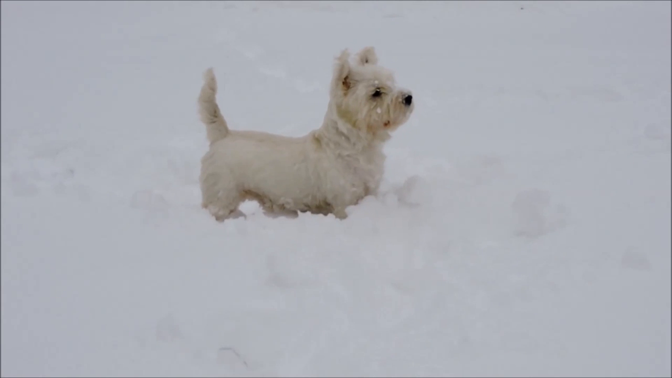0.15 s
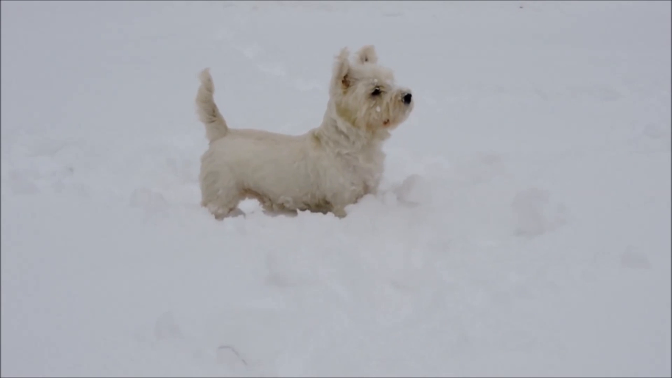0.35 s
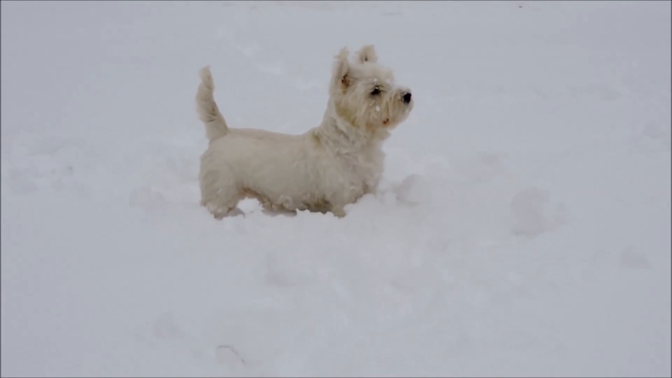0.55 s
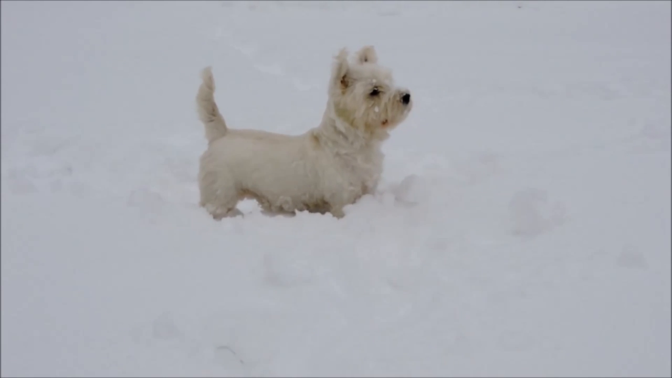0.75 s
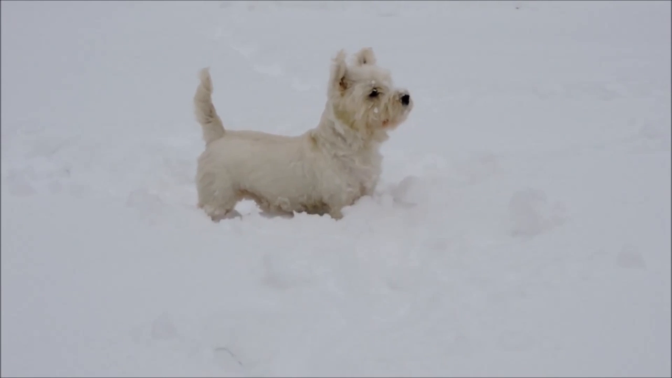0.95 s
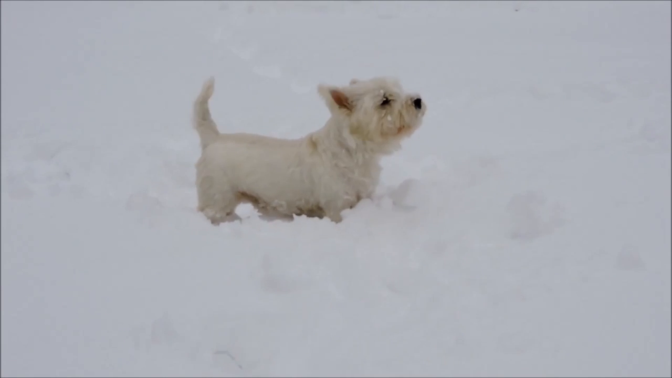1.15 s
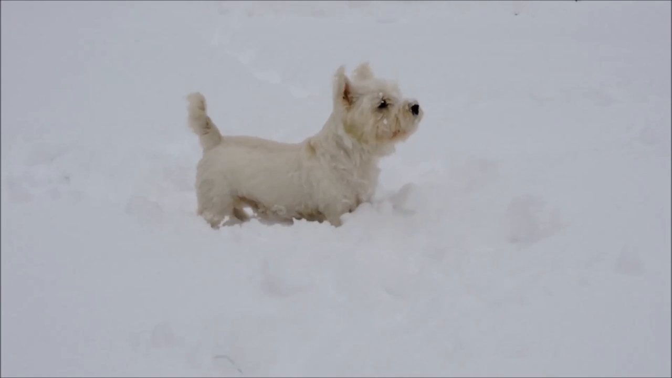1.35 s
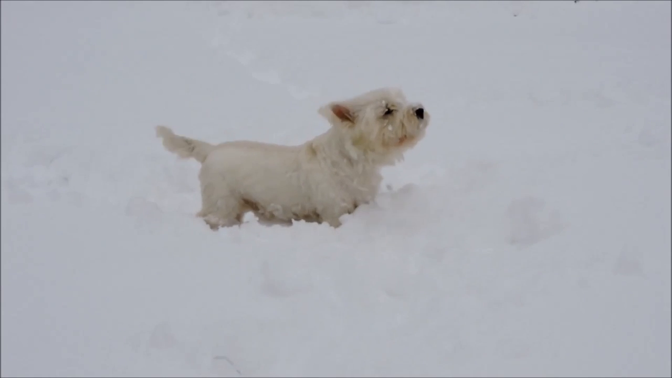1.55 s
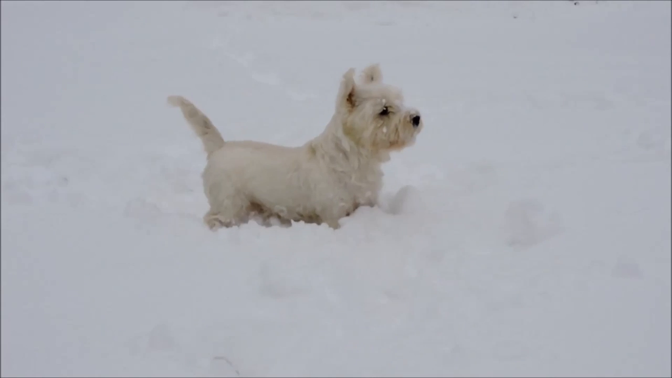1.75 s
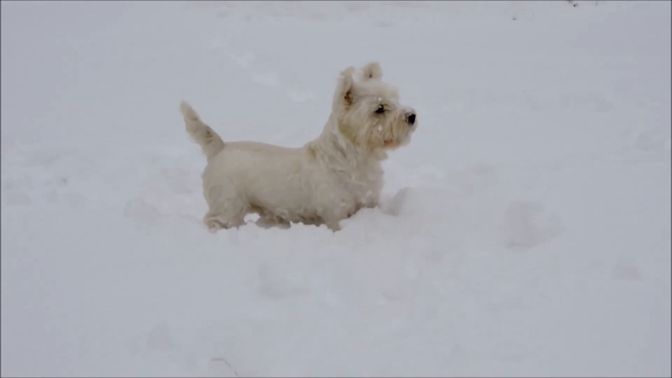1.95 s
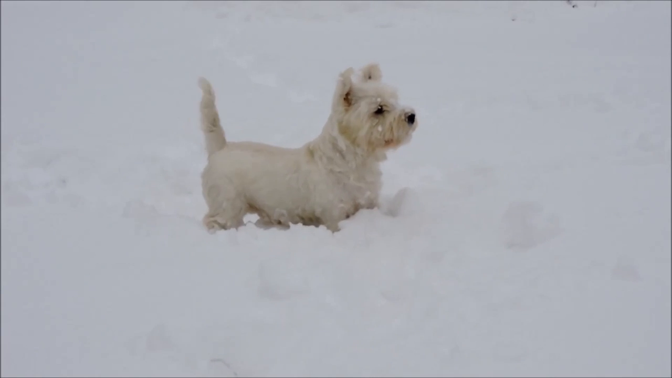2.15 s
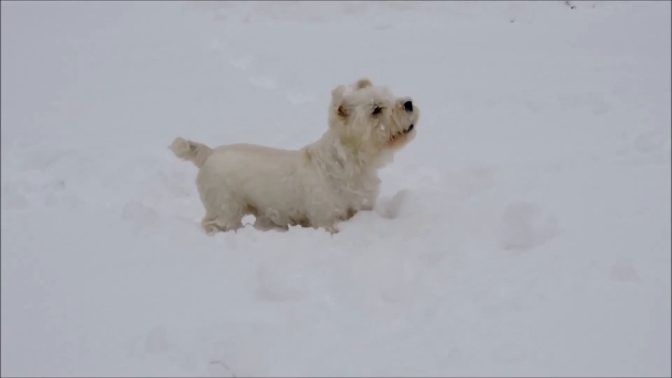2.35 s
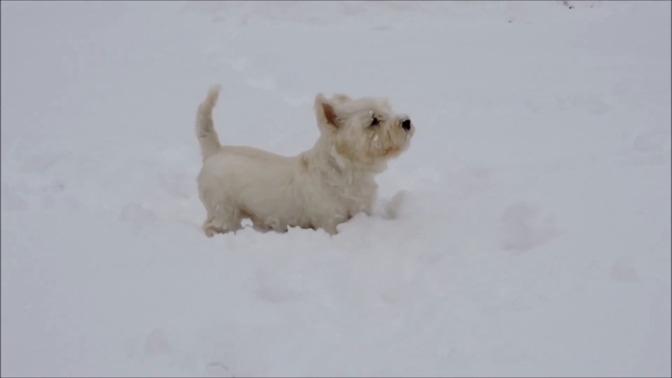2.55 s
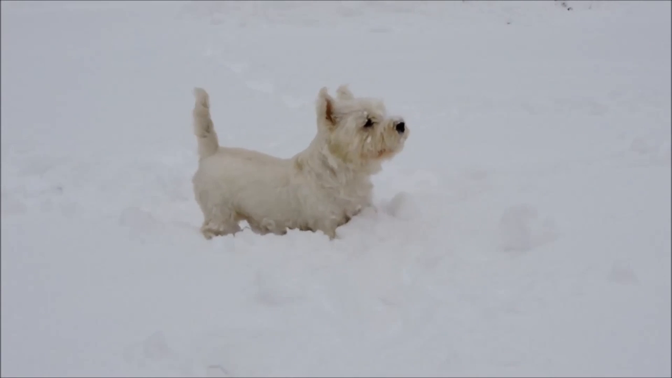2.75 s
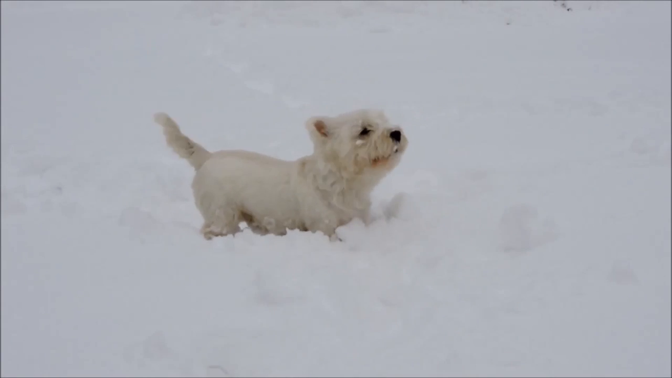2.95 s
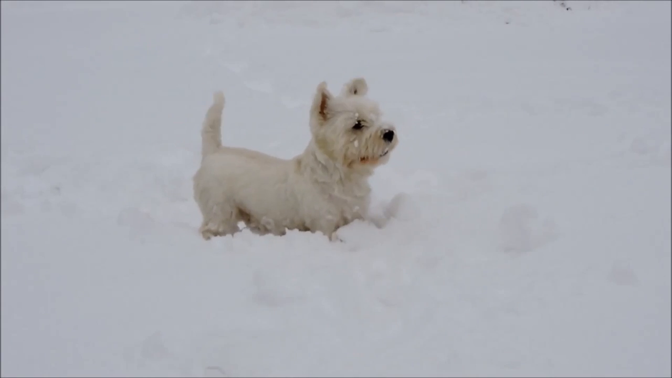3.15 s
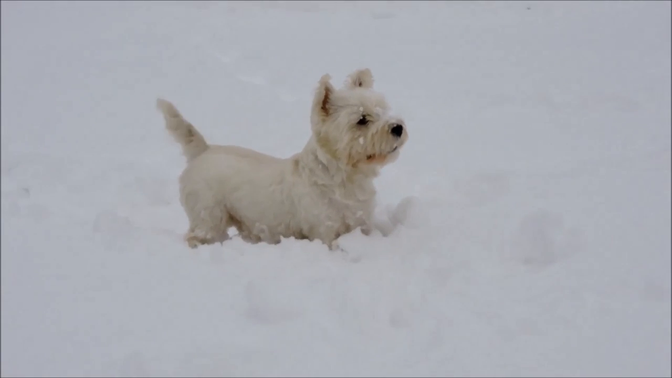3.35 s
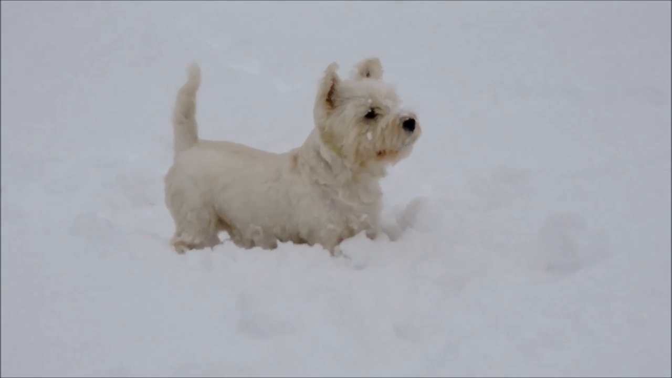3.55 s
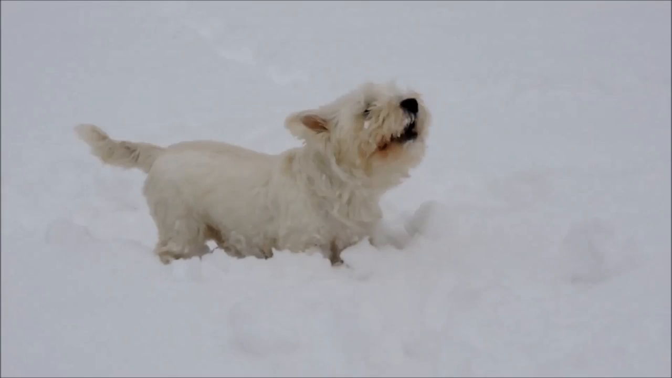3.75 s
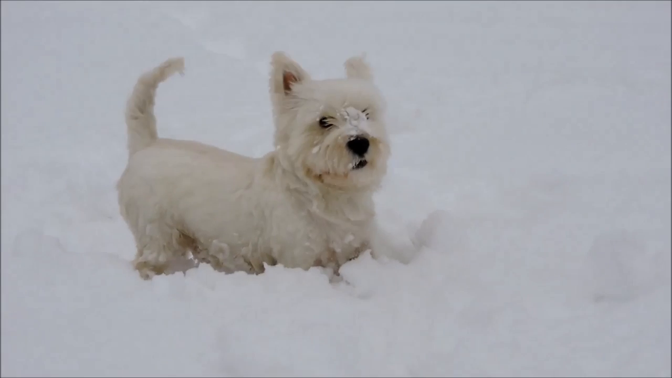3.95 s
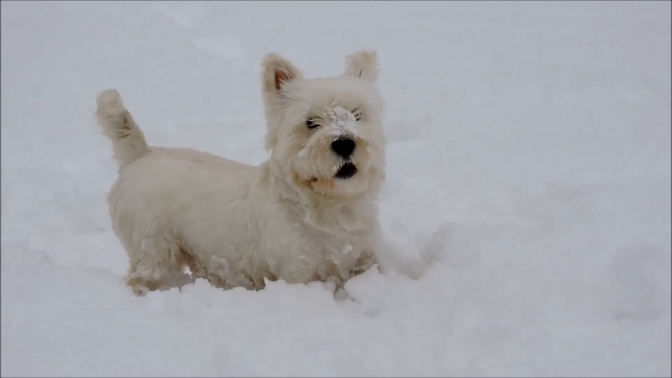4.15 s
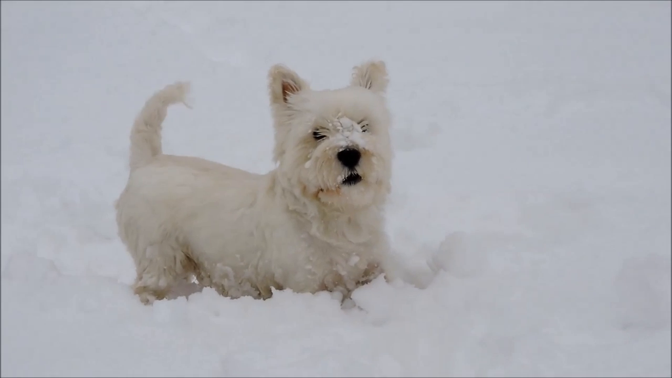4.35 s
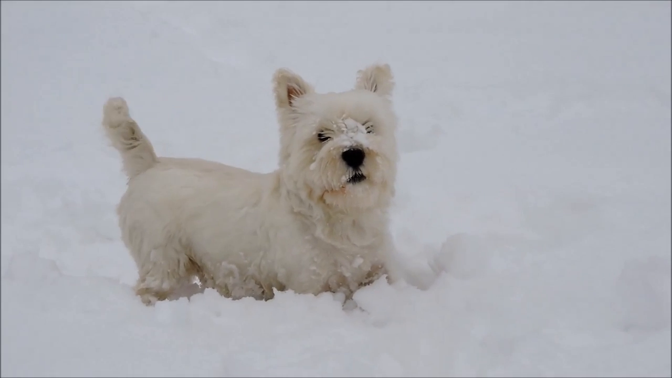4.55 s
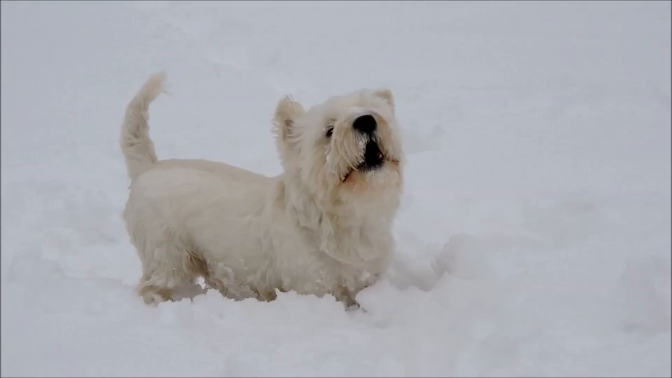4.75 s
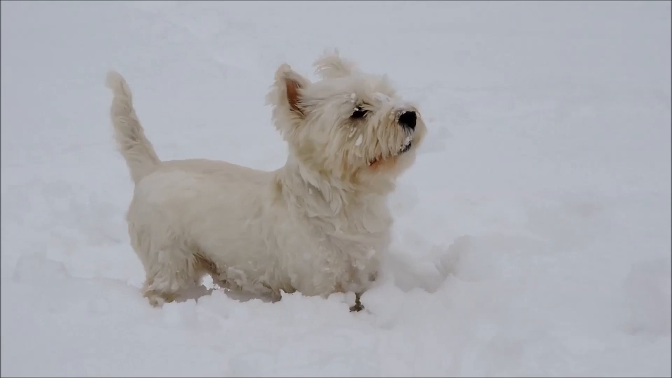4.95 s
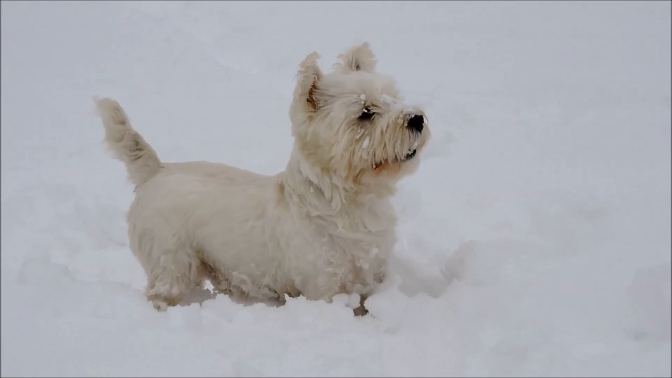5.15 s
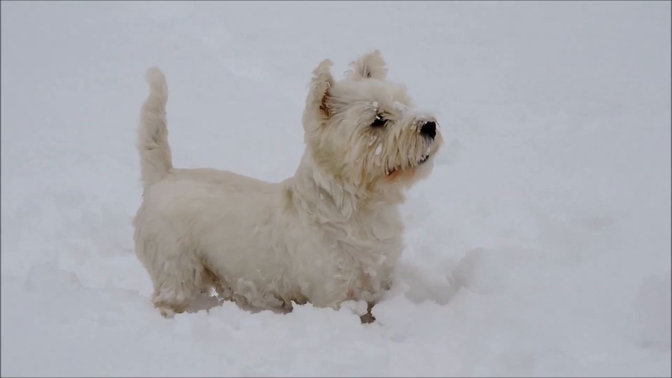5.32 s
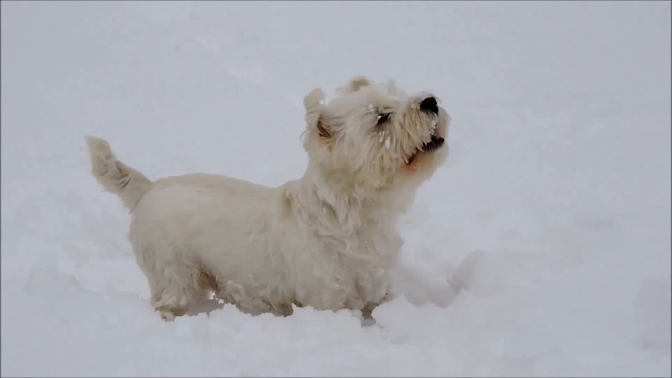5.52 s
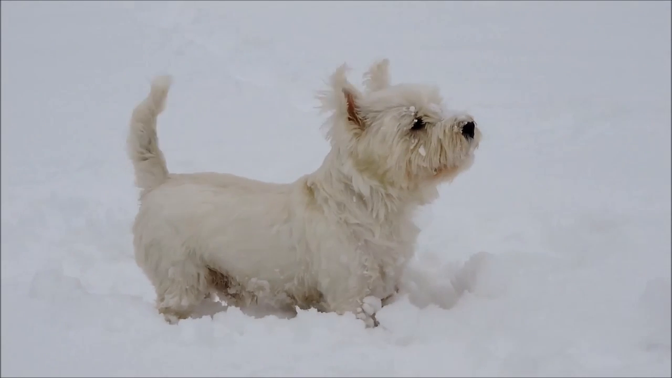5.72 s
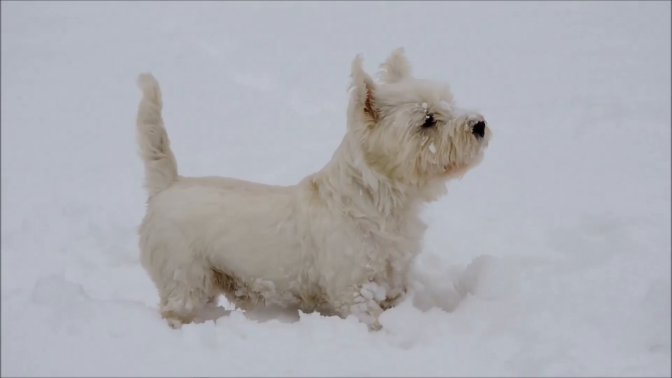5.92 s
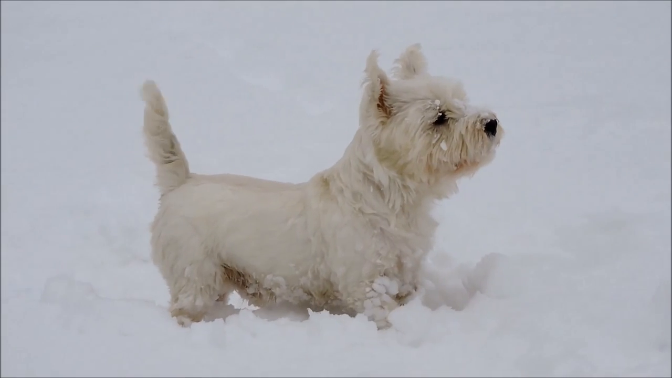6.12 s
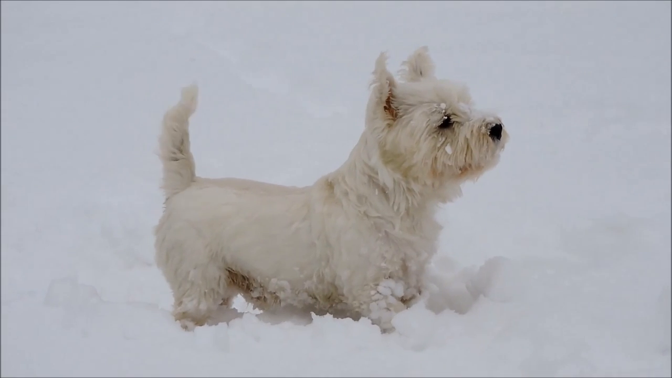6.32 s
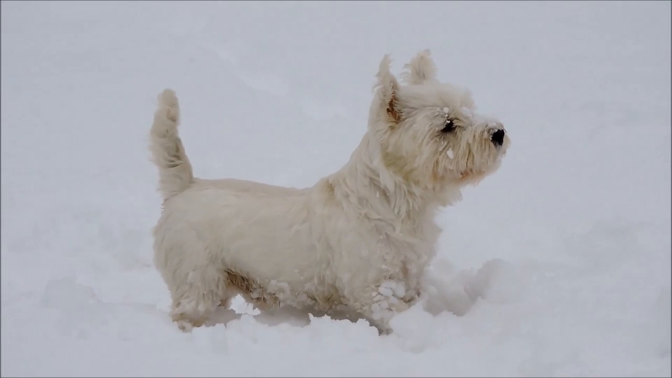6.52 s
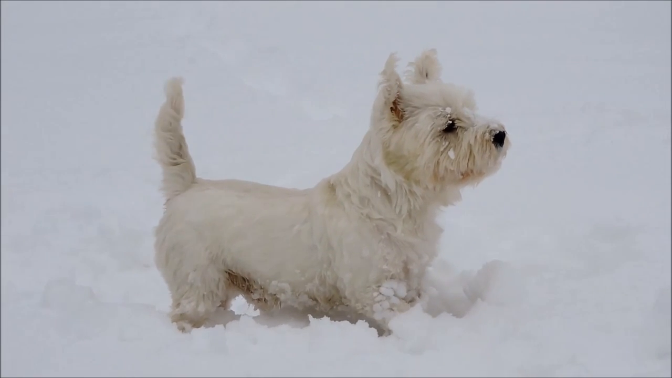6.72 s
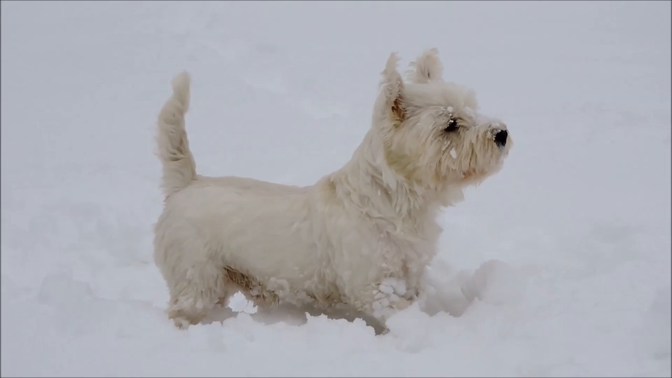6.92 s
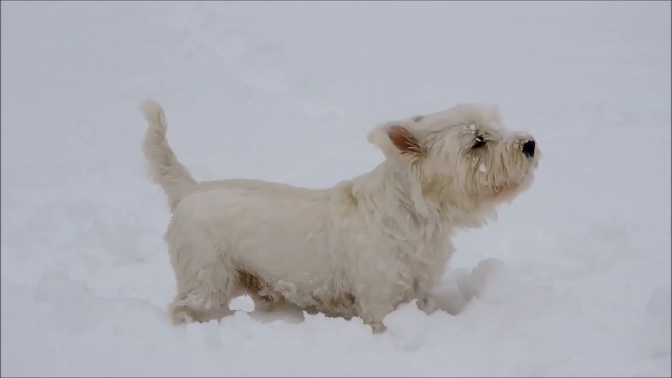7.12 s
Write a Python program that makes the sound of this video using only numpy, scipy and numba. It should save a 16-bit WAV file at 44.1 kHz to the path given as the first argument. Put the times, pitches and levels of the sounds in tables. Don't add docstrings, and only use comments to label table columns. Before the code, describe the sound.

A small white terrier stands in a snowy field and barks eight times, single short yaps that start clear and break hoarse. Gaps are uneven, with faint grumbles after some barks and tiny sniffs between. Wind thumps and flutters on a handheld camera microphone, heavier on the right, over soft far traffic hiss. Small plastic ticks dot the pauses, and the loudest barks overload slightly.

```python
import sys
import numpy as np
from scipy import signal
from scipy.fft import rfft, irfft, next_fast_len
from scipy.io import wavfile
from scipy.ndimage import uniform_filter1d, minimum_filter1d
from numba import njit

SR = 44100
rng = np.random.default_rng(int(sys.argv[2]) if len(sys.argv) > 2 else 0)


def boost_factor(decibels):
    exponent = np.asarray(decibels, float) / 20
    return 10 ** exponent


def store_wav(level_fs):
    pcm = np.round(np.clip(np.atleast_2d(level_fs), -1, 1) * 32767)
    wavfile.write(sys.argv[1], SR, pcm.T.astype(np.int16))


N = 316638

# start_s, length_s, right_thud_db, left_minus_right_db, flutter_over_thud_db
GUSTS = [(-.05, 0.47, -19.5, -7.5, -4.5), (0.493, 0.33, -21, -9.5, 2), (0.775, 0.46, -22.5, -7, 2),
         (1.305, 0.23, -22, -5, -1.5), (1.62, 0.23, -25, -3.5, -9), (2.006, 0.16, -15.5, -17, -6.5),
         (2.165, 0.23, -19.5, -11.5, -2.5), (2.568, 0.07, -23, -3, 1.5), (2.72, 0.17, -18, -10.5, -6.5),
         (2.923, 0.6, -31, -24, -3.5), (3.889, 0.087, -25.5, -20, -6), (4.257, 0.25, -26.5, -11, -4),
         (4.547, 0.29, -29, -4, 0), (4.978, 0.43, -23.5, -11, -15.5), (5.48, 0.27, -36, 3.5, 0),
         (5.776, 0.33, -27.5, -2.5, -9.5), (6.1, 0.52, -30, -2, -6.5), (6.54, 0.22, -24, -10, -8.5),
         (6.835, 0.29, -20, -14, -6.5)]
# time_s, traffic_db, drone_db
AIR_LEVELS = [(0, -47.5, -56), (1, -51, -46.5), (2.3, -50, -59.5), (2.85, -52, -51), (3.1, -57, -62),
              (4.0, -55, -62.5), (4.24, -61, -57), (4.29, -55, -59), (5.6, -54.5, -57.5),
              (5.8, -53.5, -48.5), (7.18, -55.5, -47)]
# freq_hz, level_db
TRAFFIC_SPECTRUM = [(350, -13), (600, 1.5), (950, 2.5), (1500, -1), (2300, 0.5), (4100, -5), (7000, -14),
                    (10000, -67)]
RUSTLE_SPECTRUM = [(2650, -38), (4500, -37), (5570, -0.5), (8020, 9.5), (9630, 7), (12200, 3.5),
                   (15600, -4)]
DRONE_SPECTRUM = [(200, -3), (300, -3), (520, -5.5), (700, -47)]
# full_voice_s, level_db, fall_s, sag_db_per_s, pitch_hz
BARKS = [
    (1.081, -6.5, 0.15, 82.5, 706.6),
    (1.501, -4.5, 0.17, 98.5, 674.3),
    (2.400, -4.5, 0.16, 54.5, 733.7),
    (2.884, -3, 0.18, 113.5, 751.5),
    (3.754, -9.5, 0.15, 7.5, 728),
    (4.807, -4.5, 0.15, 20.5, 747),
    (5.562, -5.5, 0.16, 44, 730),
    (7.059, -3, 0.15, 58, 749),
]
# time_s, facing_0_to_1, jaw_snap_db_per_s
HEAD = [
    (1.08, 0.78, 1044),
    (1.5, 0.1, 863.5),
    (2.4, 0.21, 898),
    (2.9, 0.46, 701),
    (3.75, 0.32, 657),
    (4.8, 0.82, 656),
    (5.56, 0.88, 1099),
    (7.06, 0, 854),
]
# freq_hz, width_hz, level_db
TEETH = [(4200, 1200, -5), (5100, 800, -6), (6400, 900, -9), (8000, 700, -2), (9800, 1600, -3),
         (13000, 2500, -10)]
# time_s, level_db, resonance_hz
GRUMBLES = [
    [(1.66, -42, 625), (1.746, -54, 639), (1.78, -46, 639)],
    [(2.55, -45.5, 635), (2.8, -50.5, 640), (2.83, -58, 667)],
    [(5.72, -43.5, 637), (5.842, -59.5, 646), (5.85, -33, 676)],
]
# time_s, level_db, resonance_hz
PUFFS = [
    [(3.9, -58, 1500), (3.95, -56, 1790), (4.01, -70, 1900)],
    [(4.96, -48.5, 1487), (5.0, -47.5, 1700), (5.06, -58, 1700)],
    [(6.56, -57, 1700), (6.61, -49.5, 1770), (6.72, -54.5, 2140), (6.78, -69, 2200)],
]
# start_s, end_s, start_hz, end_hz, level_db
SQUEAKS = [
    (3.26, 3.34, 1500, 1900, -55),
    (3.9, 3.99, 1750, 2350, -53),
    (4.96, 5.02, 1800, 2150, -51),
]
# start_s, peak_db, centre_hz, left_minus_right_db
TICKS = [
    (1.939, -42, 10700, -21),
    (4.015, -25.5, 80, -17.5),
    (3.985, -40, 700, 6),
    (4.273, -41, 1300, -11),
    (5.501, -30.5, 1860, 2),
    (6.059, -40.5, 10500, -17),
]
# time_s, hum_hz, hum_db, gear_whine_db
ZOOM = [
    (3.18, 1020, -95, -100),
    (3.24, 1035, -75, -77),
    (3.95, 975, -74, -70.5),
    (4.0, 995, -59, -83),
    (4.11, 978, -65, -77),
    (4.14, 950, -76, -100),
]

BREEZE_DB, BREEZE_PAN_DB, BREEZE_FLUTTER_DB = -36, -6, -5.5
GUST_RISE_S, GUST_FALL_S = 0.039, 0.082
RUSTLE_DB, RUSTLE_PER_DB = -63, 1.68
DUCK_DB, DUCK_AFTER_S, DUCK_BACK_S = -3.5, 0.16, 0.087
RISE_KNEE_S = .008
FALL_DB, FALL_CURVE = 37.5, 4
DB_PER_OCTAVE_RISING, DB_PER_OCTAVE_FALLING, SLACK_HZ = 60, 89.5, 531
SETTLE, SETTLE_S = .1, .07
LOCK_S, CHAOS_BEFORE, CHAOS_AFTER = .045, .75, .3
ROUGH, ROUGH_SWING, WOBBLE = .7, .15, .035
TOP_HZ, TOP_FACING_HZ, TOP_DB_PER_OCTAVE = 1688, 281, 115.5
MOUTH_TO_TOP, MOUTH_SWING, SWING_S = 0.64, 0.12, .085
MOUTH_DB, MOUTH_OPENS_DB = -2, -16
BREATH_DB, BREATH_PER_EFFORT_RISING, BREATH_PER_EFFORT_FALLING = -34, -0.23, 0.16
BREATH_FACING_DB, SHADE_DB_PER_KHZ = 6.5, -.5
NOSE_HZ = 3210
YAP_HZ, YAP_DB, YAP_S, YAP_FACING_DB = 3540, -30.5, 0.01, 17.5


@njit
def ring(x, g, k):
    band, low = np.empty(len(x)), np.empty(len(x))
    b, l = 0., 0.
    for i in range(len(x)):
        v = (b + g[i] * (x[i] - l)) / (1 + g[i] * (g[i] + k[i]))
        band[i] = k[i] * v
        low[i] = l + g[i] * v
        b, l = 2 * v - b, l + 2 * g[i] * v
    return band, low


def svf(x, hz, width, kind="band"):
    g = np.tan(np.pi * np.clip(hz, 5, .45 * SR) / SR) + 0 * x
    band, low = ring(x, g, np.abs(width / hz) + 0 * x)
    return {"band": band, "low": low, "high": x - band - low}[kind]


def twice(x, hz, width, second_width):
    return svf(svf(x, hz, width), hz, second_width)


def steep(x, hz, kind):
    for damping in (1.96, 1.66, 1.11, .39):
        x = svf(x, hz, hz * damping, kind)
    return x


def unit(x, span=0):
    power = uniform_filter1d(x ** 2, int(span * SR)) if span else np.mean(x ** 2)
    return x / np.sqrt(power + 1e-18)


def curves(table, n=N, start=0):
    s, *columns = np.transpose(table)
    t = (start + np.arange(n)) / SR
    return [np.interp(t, s, c) for c in columns]


def walk(rate, n=N):
    hold = int(SR / rate)
    steps = np.repeat(rng.standard_normal(N // hold + 1), hold)
    return unit(uniform_filter1d(uniform_filter1d(steps, hold), hold)[:n])


def colour(spectrum):
    hz, db = np.transpose(spectrum)
    size = 2 * next_fast_len(N // 2)
    f = np.arange(size // 2 + 1) * SR / size
    shape = boost_factor(np.interp(np.log(f + 1), np.log(hz), db, left=-90))
    return unit(irfft(rfft(rng.standard_normal(size)) * shape, size)[:N])


def add(out, sound, start):
    n = min(sound.shape[1], N - start)
    faded = sound * signal.windows.tukey(sound.shape[1], .06)
    out[:, start:start + n] += faded[:, :n]


def gusts():
    t = np.arange(N) / SR
    power = boost_factor(BREEZE_DB + np.array([[BREEZE_PAN_DB], [0], [BREEZE_FLUTTER_DB]])) ** 2
    for s, length, db, pan_db, flutter_db in GUSTS:
        fall = np.exp(-np.maximum(t - s - length + GUST_FALL_S / 2, 0) / GUST_FALL_S)
        shape = np.clip((t - s) / GUST_RISE_S, 0, 1) * fall
        power = power + (shape * boost_factor(db + np.array([[pan_db], [0], [flutter_db]]))) ** 2
    return 10 * np.log10(power)


def eddies(rate, spread_db):
    moment, side, strength = rng.random((3, N))
    return (moment < rate / SR) * np.sign(side - .35) * boost_factor(-spread_db * np.log(strength + 1e-9))


def wind():
    left_db, right_db, flutter_db = gusts()
    ports = []
    for thud_db, quick_db, flutter_hz in ((left_db, left_db - 11, 100), (right_db, flutter_db, 135)):
        kicks = eddies(rate=180, spread_db=2.5) * boost_factor(4.5 * walk(10))
        slow = eddies(rate=200, spread_db=2.0) + 0.68 * kicks
        thud = steep(svf(slow, 45, 110), 94.5, "low")
        flutter = steep(twice(kicks, flutter_hz, 94.4, 135), 372, "low")
        ports.append(boost_factor(thud_db) * unit(thud, 0.23) + boost_factor(quick_db) * unit(flutter, 0.21))
    return np.array(ports)


def ducking():
    since = np.arange(N) / SR - np.array(BARKS)[:, :1] - DUCK_AFTER_S
    recovery = np.exp(-np.abs(since) / DUCK_BACK_S)
    return DUCK_DB * np.where(since > 0, recovery, np.clip(1 + since / 0.3, 0, 1)).sum(axis=0)


def distant_air():
    traffic_db, drone_db = curves(AIR_LEVELS) + ducking()
    rustle_db = RUSTLE_DB + RUSTLE_PER_DB * (traffic_db + 54.5)
    # spectrum, level_db, likeness of the ports, flicker_db, right_minus_left_db
    layers = ((TRAFFIC_SPECTRUM, traffic_db + 4.5, .75, .8, 1),
              (RUSTLE_SPECTRUM, rustle_db, .6, 1.6, 5),
              (DRONE_SPECTRUM, drone_db, .8, 1.5, 0))
    out = 0
    for spectrum, db, like, flicker_db, right_db in layers:
        common = colour(spectrum)
        own = np.sqrt(1 - like ** 2)
        left = like * np.roll(common, 7) + own * colour(spectrum)
        right = like * common + own * colour(spectrum)
        ports = np.array([left * boost_factor(-right_db / 2), right * boost_factor(right_db / 2)])
        out = out + boost_factor(db + flicker_db * walk(36)) * ports
    return out


def effort(t, snap, fall_s, sag):
    rise = snap * (RISE_KNEE_S - np.hypot(t, RISE_KNEE_S))
    return np.where(t < 0, rise, -sag * t - FALL_DB * np.abs(t / fall_s) ** FALL_CURVE)


def controls(t, facing, snap, peak_db, fall_s, sag, pitch_hz):
    push = np.maximum(effort(t, snap, fall_s, sag), -60)
    swing = np.cos(2 * np.pi * t / SWING_S)
    rising = t < 0
    top_hz = TOP_HZ + TOP_FACING_HZ * facing
    settled_hz = pitch_hz * (1 - SETTLE * np.clip(t / SETTLE_S, 0, 1) ** 2)
    falling_hz = np.maximum(settled_hz * 2 ** (push / DB_PER_OCTAVE_FALLING), SLACK_HZ)
    hz = np.where(rising, pitch_hz * 2 ** (push / DB_PER_OCTAVE_RISING), falling_hz)
    mouth_hz = MOUTH_TO_TOP * top_hz * (1 + MOUTH_SWING * swing)
    mouth_db = MOUTH_DB + rising * np.minimum(push - MOUTH_OPENS_DB, 0)
    per_effort = np.where(rising, BREATH_PER_EFFORT_RISING, BREATH_PER_EFFORT_FALLING)
    breath_db = BREATH_DB + BREATH_FACING_DB * facing + push * per_effort
    closing_hz = top_hz * 2 ** (push / TOP_DB_PER_OCTAVE)
    return peak_db + push, hz, mouth_hz, mouth_db, closing_hz, breath_db, ROUGH - ROUGH_SWING * swing


@njit
def folds(hz, rough, chance, jitter, shimmer):
    out = np.zeros(len(hz) + 1)
    phase, k, stretch = 0., 0, 1.
    for i in range(len(hz)):
        step = hz[i] * stretch / SR
        phase += step
        if phase >= 1:
            phase, k = phase - 1, k + 1
            size = np.exp(shimmer * rough[i] * chance[k, 0])
            stretch = np.exp(jitter * rough[i] * chance[k, 1])
            out[i] += size * phase / step
            out[i + 1] += size * (1 - phase / step)
    return out[:-1]


def fold_pulses(hz, rough, locked):
    cycle = np.arange(600)
    chaos = np.where(cycle > hz[~locked].sum() / SR, CHAOS_AFTER, CHAOS_BEFORE)[:, None]
    pattern = .8 * np.cos(2 * np.pi * cycle / 3)[:, None]
    chance = np.clip(chaos * rng.standard_normal((600, 2)) + pattern, -1.7, 1.7)
    return folds(hz, rough ** 1.5, chance, jitter=.4, shimmer=.8)


def bark_voice(source, hz, mouth_hz, mouth_db, top_hz, rough):
    throat = svf(svf(source, hz, 110 + 520 * rough), hz * 1.06, 800)
    throat = steep(throat, np.minimum(.82 * hz, 490), "high")
    mouth = svf(svf(source, mouth_hz, 300 + 300 * rough), mouth_hz, 650)
    mouth = mouth + 0.62 * svf(svf(source, 0.94 * top_hz, 200), 0.86 * top_hz, 490)
    share = np.clip(boost_factor(mouth_db - 0.64), 0, .95)
    voice = np.sqrt(1 - share ** 2) * unit(throat, 0.015) - share * unit(mouth, 0.017)
    chest = unit(svf(svf(source, 370, 153), 324, 220))
    return steep(voice, .96 * top_hz, "low") + boost_factor(-27.5) * chest


def bark_breath(pulses, hz, db, facing, noises):
    n = len(hz)
    puffs = unit(svf(pulses, hz, 900), .03) * 0.53 + 1
    shade = (1 - facing) * SHADE_DB_PER_KHZ
    patches = [boost_factor(d + .2 * db + 4 * walk(45, n) + shade * f / 1000) for f, w, d in TEETH]
    lips = 1 + .05 * walk(14, n)
    ports = []
    for mix in (.3, -.3):
        stream = (noises[0] + mix * noises[1]) * puffs
        hiss = 0
        for k, (f, w, d) in enumerate(TEETH):
            hiss = hiss + (-1) ** k * patches[k] * svf(svf(stream, f * lips, 0.88 * w), f, 4 * w)
        ports.append(hiss)
    return unit(np.array(ports)) * np.array([[.8], [1.2]])


def bark(s, *voice_of):
    start, n = int((s - .08) * SR), int(.28 * SR)
    t = (start + np.arange(n)) / SR - s
    facing, snap = np.ravel(curves(HEAD, 1, int(s * SR)))
    db, hz, mouth_hz, mouth_db, top_hz, breath_db, rough = controls(t, facing, snap, *voice_of)
    hz = hz * (1 + WOBBLE * walk(40, n))
    rough = np.clip(np.maximum(rough, (-db - 22) / 15), 0, 1)
    noises = rng.standard_normal((3, n))
    locked = t > LOCK_S
    pulses = fold_pulses(hz, rough, locked)
    turbulence = np.where(locked, CHAOS_AFTER + .1, CHAOS_BEFORE) * rough * noises[0]
    source = unit(pulses - uniform_filter1d(pulses, 400)) + turbulence
    airy = source + noises[0]

    voice = bark_voice(source, hz, mouth_hz, mouth_db, top_hz, rough)
    right = np.roll(boost_factor(-3.0) * voice + 0.31 * svf(voice, 2420, 1200), -2)
    nose = unit(twice(airy, NOSE_HZ, 220, 400), .04)
    nose = boost_factor(-33) * uniform_filter1d(.4 + .6 * locked, 2000) * nose
    yap = np.exp(-t ** 2 / YAP_S ** 2) * unit(twice(airy, YAP_HZ, 400, 400), 0.12)
    yap = boost_factor(YAP_DB + YAP_FACING_DB * (facing - .5)) * yap
    rasp = unit(steep(svf(airy, 2600, 580), 1760, "high"), 0.079)
    rasp = boost_factor(0.57 * db + 8.5) * rasp
    breath = .6 * bark_breath(pulses, hz, db, facing, noises[1:])
    breath = breath + .6 * np.array([rasp, np.roll(rasp, -3)])
    return start, boost_factor(db + 1.7) * (np.array([voice, right]) + boost_factor(breath_db) * breath + nose + yap)


def barks():
    out = np.zeros((2, N))
    for row in BARKS:
        start, sound = bark(*row)
        add(out, sound, start)
    scatter = rng.standard_normal((2, 9000)) * np.exp(-np.arange(9000) / SR / .06)
    delay = np.zeros(int(.13 * SR))
    echo = []
    for port, trees in zip(out, scatter):
        echo.append(np.r_[delay, signal.fftconvolve(svf(port, 1400, 1600), trees)][:N])
    return out + boost_factor(-72.5) * np.array(echo)


def throat_noises(tables, air_share):
    out = np.zeros((2, N))
    for table in tables:
        start, n = int(table[0][0] * SR), int((table[-1][0] - table[0][0]) * SR)
        db, hz = curves(table, n, start)
        chance = rng.standard_normal((600, 2))
        growl = folds(162 - 130 * np.arange(n) / SR, np.ones(n), chance, jitter=.03, shimmer=.3)
        source = unit(growl) + air_share * rng.standard_normal(n)
        sound = boost_factor(db) * unit(twice(source, hz, 0.5 * hz, 1.9 * hz))
        add(out, sound * np.array([[1.1], [.9]]), start)
    return out


def grumbles():
    return throat_noises(GRUMBLES, air_share=.3)


def camera_ticks():
    out = np.zeros((2, N))
    for s, db, hz, pan_db in TICKS:
        burst = rng.standard_normal(600) * np.exp(-np.arange(600) / SR / 0.003)
        tick = twice(burst, hz, 1.3 * hz, 1.4 * hz)
        tick = boost_factor(db) * tick / np.abs(tick).max()
        start = int(s * SR)
        out[:, start:start + 600] += tick * boost_factor(np.array([[pan_db], [-pan_db]]) / 2)
    return out


def zoom_motor():
    hz, hum_db, whine_db = curves(ZOOM)
    noise = rng.standard_normal(N)
    hum = boost_factor(hum_db) * unit(svf(noise, hz, 45))
    whine = boost_factor(whine_db) * unit(twice(noise, 14800, 2500, 3000))
    return (hum + whine) * np.array([[1.5], [.4]])


def squeaks():
    out = np.zeros((2, N))
    for t0, t1, hz0, hz1, db in SQUEAKS:
        n = int((t1 - t0) * SR)
        whistle = unit(svf(rng.standard_normal(n), np.linspace(hz0, hz1, n), 60))
        add(out, boost_factor(db) * np.hanning(n) * whistle * np.array([[.7], [1.3]]), int(t0 * SR))
    return out


def airy_puffs():
    return throat_noises(PUFFS, air_share=4)


def scene():
    dog = barks() + grumbles() + squeaks() + airy_puffs()
    return wind() + distant_air() + dog + camera_ticks() + zoom_motor()


def roll_off(x):
    return signal.sosfilt(signal.butter(12, 15780, fs=SR, output="sos"), x)


def record(dry):
    room = np.minimum(1.1 / (np.abs(dry).max(axis=0) + 1e-9), 1)
    gain = uniform_filter1d(minimum_filter1d(room, size=160), size=260)
    return roll_off(np.clip(dry * gain, -1, 1))


dry = scene()
out = record(dry)
store_wav(out)
```